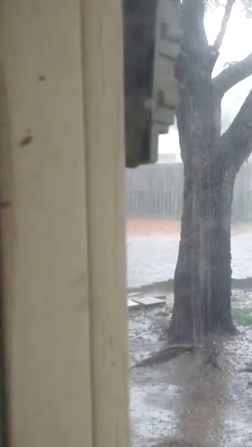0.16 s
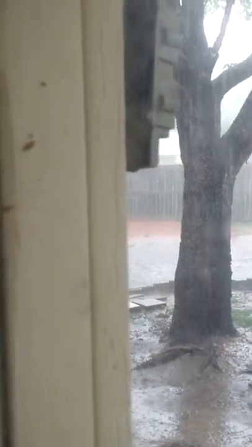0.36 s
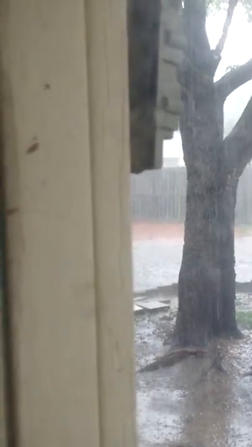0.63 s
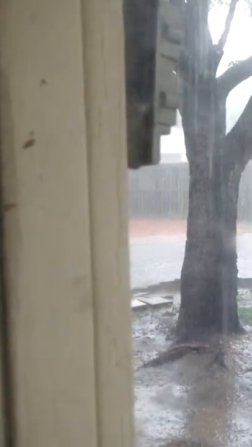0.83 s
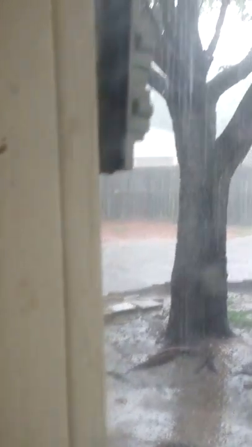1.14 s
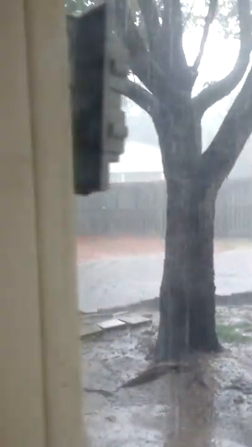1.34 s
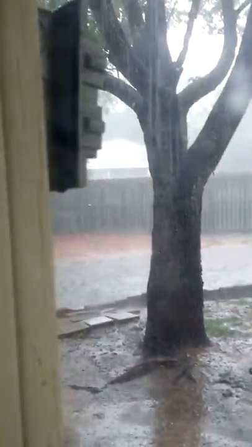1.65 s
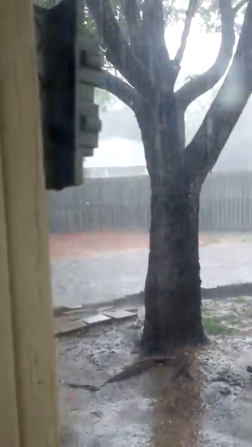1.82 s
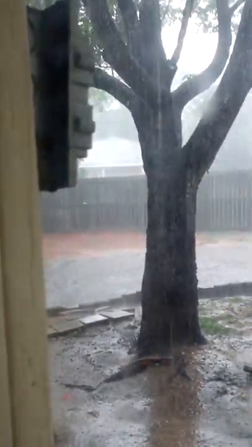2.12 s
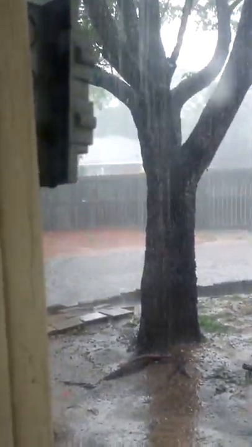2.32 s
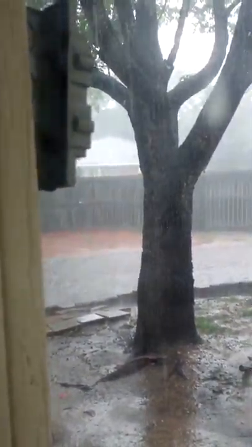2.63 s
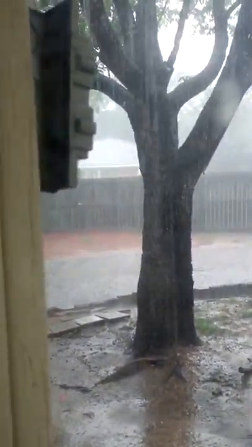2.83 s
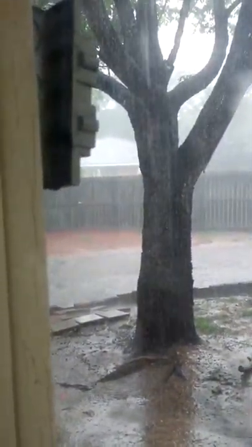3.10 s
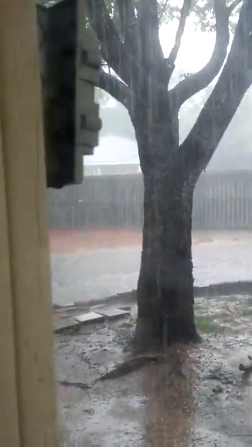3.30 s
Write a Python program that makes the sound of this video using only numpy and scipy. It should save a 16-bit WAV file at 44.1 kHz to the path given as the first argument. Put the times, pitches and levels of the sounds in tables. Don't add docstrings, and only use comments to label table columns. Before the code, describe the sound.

Heavy rain pours without pause on a muddy yard, a wide, bright, crackling hiss heard from a doorway on a stereo phone. It eases slightly around 0.5-1.3 s, is strongest near 1.8 s, then eases. Big drops tap close by, notably at 0.9, 2.3 and 2.9 s, with small splashes near 0.8 and 2.1 s and a plop at 2.3 s. Low roof roar and faint gutter hum lie beneath.

```python
import sys
import numpy as np
from scipy import signal
from scipy.fft import rfft, irfft
from scipy.io import wavfile
from scipy.ndimage import uniform_filter1d

SR = 44100
rng = np.random.default_rng(int(sys.argv[2]) if len(sys.argv) > 2 else 0)


def gain_from_decibels(decibels):
    exponent = np.asarray(decibels, float) / 20
    return 10 ** exponent


def persist_wave(psi):
    counts = np.round(np.clip(psi, -1, 1) * 32767).astype(np.int16)
    wavfile.write(sys.argv[1], SR, np.atleast_2d(counts).T)


N = 152586
T = np.arange(N) / SR
HZ = np.fft.rfftfreq(N, 1 / SR)
AXIS_LAG_S = 0.0003831


def evened(x):
    return x / np.sqrt(np.mean(x ** 2) + 1e-20)


def curve_db(points):
    hz, value = np.transpose(points)
    return np.interp(np.log(HZ + 1), np.log(hz), value)


def shaped(x, points):
    return irfft(rfft(x) * gain_from_decibels(curve_db(points)), N)


def peak(hz, width_hz):
    return 1 / (1 + 2j * (HZ - hz) / width_hz)


def resonated(hz, width_hz):
    return evened(irfft(rfft(rng.standard_normal(N)) * peak(hz, width_hz), N))


def drift(rate_hz):
    return evened(irfft(rfft(rng.standard_normal(N)) * peak(0, rate_hz) ** 2, N))


def flicker(rate_hz):
    rise = np.maximum(np.gradient(drift(rate_hz)), 0)
    fall_s = 0.014
    x = signal.lfilter([1], [1, -np.exp(-1 / (fall_s * SR))], rise)
    return evened(x - uniform_filter1d(x, size=5000))


def rain(drops_per_s, spread_db, near_share, gust_db):
    size = gain_from_decibels(spread_db * np.minimum(rng.exponential(1, N), 3.3))
    size = size * (rng.random(N) < drops_per_s / SR)
    pitch = rng.integers(0, 11, N)
    t = T[:512]
    ticks = np.zeros(N)
    for k, hz in enumerate(np.geomspace(900, 14000, 11)):
        decay = gain_from_decibels(-60 * t * hz / 12)
        tick = hz * decay * np.sin(2 * np.pi * hz * t)
        ticks += signal.oaconvolve(size * (pitch == k), tick)[:N]
    hiss = np.sqrt(1 - near_share) * rng.standard_normal(N)
    return (hiss + np.sqrt(near_share) * evened(ticks)) * gain_from_decibels(gust_db)


def ports(x, lag_s):
    turn = np.exp(1j * np.pi * HZ * lag_s)
    return irfft(rfft(x) * np.array([1 / turn, -turn]), N)


# (frequency [Hz], density [dB per Hz])
ROAR = [(25, -5.5), (45, -3), (100, -6), (200, -1), (400, 1.5), (600, -6), (900, -8), (1500, -31)]
# (frequency [Hz], correlation [-1 to 1])
LIKENESS = [(40, -.55), (100, 0), (170, .3), (350, .3), (600, .4), (800, .95)]


def roof():
    a, b = rfft(shaped(rng.standard_normal((2, N)), ROAR))
    same = curve_db(LIKENESS)
    other = same * a + np.sqrt(1 - same ** 2) * b
    return gain_from_decibels(-39.5) * evened(irfft(np.array([a, other]), N))


def hum(track, waver_hz, waver_db):
    s, hz, db = np.transpose(track)
    turns = np.cumsum(np.interp(T, s, hz) + waver_hz * drift(16.6)) / SR
    level_db = np.interp(T, s, db) + waver_db * drift(20)
    return gain_from_decibels(level_db) * np.sqrt(2) * np.sin(2 * np.pi * turns)


# (frequency [Hz], width [Hz], level [dB])
GUTTER_MODES = [(153.2, 4, -58), (271.4, 11.5, -49.5), (309, 12.5, -51), (345.4, 4.7, -53.5),
                (468.5, 18, -51)]
# (time [s], frequency [Hz], level [dB])
UPPER_HUM = [(0.0, 400, -37), (0.01, 403.9, -45.5), (0.12, 401.6, -37.5), (0.21, 402.8, -60),
             (0.33, 403.4, -44), (0.51, 402.4, -56), (0.64, 404, -41), (0.75, 401.7, -46.5),
             (1.41, 405.2, -43.5), (1.5, 407.2, -73), (1.53, 404.8, -39), (1.75, 404.4, -49),
             (2.02, 402.3, -36), (2.21, 406.6, -53), (2.23, 407.2, -38), (2.4, 404.3, -51.5),
             (3.2, 400.4, -39), (3.46, 401.1, -43.5)]
# (time [s], frequency [Hz], level [dB])
LOWER_HUM = [(0.0, 195, -40), (0.01, 201, -61), (0.06, 197.7, -42), (0.22, 203, -61), (0.27, 203, -44),
             (0.43, 201.3, -49), (0.48, 202.8, -40), (0.57, 203, -51), (0.59, 202.1, -45.5),
             (1.72, 201.3, -49.5), (1.74, 204.5, -68), (1.91, 202.5, -45.5), (2.11, 197.7, -48),
             (2.2, 202.1, -50), (3.27, 201.4, -47), (3.32, 203, -40), (3.37, 201.1, -51),
             (3.46, 199.4, -41)]


def gutter():
    modes = sum(gain_from_decibels(db) * resonated(hz, width_hz) for hz, width_hz, db in GUTTER_MODES)
    high = hum(UPPER_HUM, 2.96, 1.8)
    low = hum(LOWER_HUM, 3.0, 1.44) + modes
    left, right = ports(low, -.0005)
    return np.array([left + high * gain_from_decibels(-3.0), high * gain_from_decibels(1.5) - right])


# (frequency [Hz], density [dB per Hz])
WASH = [(600, -31), (1900, -7), (4000, -5), (6500, 0.5), (8500, -7), (11000, -6), (13300, -2), (15000, -35)]


def wash(gust):
    sides = []
    for side in "lr":
        gust_db = 1.3 * gust + 0.59 * flicker(90)
        sides.append(shaped(rain(1600, 3.1, 0.2, gust_db), WASH))
    return gain_from_decibels(-37.5) * evened(np.array(sides))


# (start [s], decay [s], level [dB])
SPLASHES = [
    (2.071, .012, -26),
    (2.084, .012, -26),
    (2.139, .012, -28),
    (1.58, .02, -31),
    (.72, .012, -30),
    (.848, .008, -29),
    (.752, .01, -30),
    (.81, .012, -31),
]


def splashes():
    level = np.zeros(N)
    for s, decay_s, db in SPLASHES:
        level += gain_from_decibels(db) * np.exp(-np.maximum(T - s, 0) / decay_s) * (T > s)
    return level * evened(shaped(rng.standard_normal(N), WASH))


# (frequency [Hz], density [dB per Hz])
SPRAY = [(2500, -29.5), (5000, -11), (6500, 4.5), (8500, -0.5), (10500, -2.5), (11300, 1.5), (13000, -0.5),
         (15000, -18)]
# (frequency [Hz], level [dB])
DIRECT = [(6000, 0), (8000, -1.5), (11000, -3), (14000, -4)]


def spray(gust):
    steady = gain_from_decibels(-30.5) * evened(shaped(rain(1500, 3.4, 0.24, 0.97 * gust), SPRAY))
    return ports(shaped(steady + splashes(), DIRECT), 0.000339)


def ring(s, hz, db, t60_s):
    out, t = np.zeros(N), T[:3000]
    envelope = gain_from_decibels(db - 60 * t / t60_s) * np.minimum(t / .0009, 1)
    out[round(s * SR):][:len(t)] = envelope * np.sin(2 * np.pi * hz * t)
    return out


# (time [s], peak [dB], frequency [Hz])
DROPS = [(0.1067, -17, 3900), (0.388, -17.5, 1985), (0.7049, -28, 1680), (0.8474, -17.5, 3554),
         (0.9023, -30, 1877), (0.9178, -13, 3440), (1.0442, -19.5, 1870), (1.3364, -18, 3730),
         (1.3894, -22, 1773), (1.951, -15.5, 3644), (2.138, -22, 1740), (2.3106, -15, 1832),
         (2.803, -14.5, 4280), (2.8936, -11.5, 1880), (3.2794, -27, 2075)]
# (time [s], frequency [Hz], level [dB], t60 [s])
PLOPS = [
    (2.332, 1150, -25.5, .065),
    (2.329, 1850, -22, .035),
]


def close_drops():
    out = sum(ring(*plop) for plop in PLOPS)
    frame_hz, echo_s = 1880, .0062
    for s, db, hz in DROPS:
        db = db + 1.5
        t60_s = .019 * frame_hz / hz
        echo_db = -3.5 - 6 * max(np.log2(hz / frame_hz), 0)
        out = out + ring(s, hz, db, t60_s)
        out = out + ring(s + echo_s, hz, db + echo_db, 1.5 * t60_s)
    return ports(out, AXIS_LAG_S)


# (frequency [Hz], density [dB per Hz])
YARD = [(300, -10), (700, -5), (1200, -3.5), (2600, -0.5), (4500, -6), (6300, 0), (8000, -10), (15000, -19)]
# (frequency [Hz], level [dB])
FAR_END = [(600, 0), (1000, -3), (1500, -6), (1900, -13), (2400, -5), (3200, -4), (4600, -2), (6000, -1)]


def yard(gust):
    near = evened(shaped(rain(1200, 4.0, .27, 1.14 * gust), YARD))
    far = evened(shaped(rain(1200, 4.0, .27, 1.14 * gust), YARD))
    return gain_from_decibels(-31.5) * (ports(near, AXIS_LAG_S) + ports(shaped(far, FAR_END), -AXIS_LAG_S))


# (frequency [Hz], width [Hz], level [dB])
FRAME = [(1880, 209, 10), (3586, 730, 2), (4270, 325, 4)]
# (frequency [Hz], width [Hz], depth [0-1])
NOTCH = (11350, 650, .6)
# (frequency [Hz], level [dB])
SHADOW = [(3000, -0.5), (5500, -0.5), (7000, -4.5), (10000, -6), (12500, -8), (14500, -6)]


def door_frame(x):
    response = 1 + sum(gain_from_decibels(db) * peak(hz, width_hz) for hz, width_hz, db in FRAME)
    notch_hz, notch_width_hz, depth = NOTCH
    response = response * (1 - depth * peak(notch_hz, notch_width_hz))
    left, right = irfft(rfft(x) * response, N) * gain_from_decibels(-3.5)
    return np.array([shaped(left, SHADOW), right])


# (time [s], level [dB])
DOWNPOUR = [
    (0, -0.2),
    (.45, -.6),
    (1.05, -0.56),
    (1.4, -0.2),
    (1.8, 0.5),
    (2.2, -0.5),
    (2.6, -0.44),
    (2.999, -0.34),
    (3.46, -0.5),
]


def downpour():
    yard_gust = flicker(46)
    spray_gust = evened(yard_gust + flicker(71))
    mix = yard(yard_gust) + spray(spray_gust) + wash(spray_gust)
    s, db = np.transpose(DOWNPOUR)
    return door_frame(mix * gain_from_decibels(np.interp(T, s, db)))


def scene():
    return roof() + gutter() + close_drops() + downpour()


def roll_off(x):
    return signal.sosfilt(signal.butter(12, 15250, fs=SR, output="sos"), x)


def record(dry):
    return roll_off(dry)


dry = scene()
out = record(dry)
persist_wave(out)
```